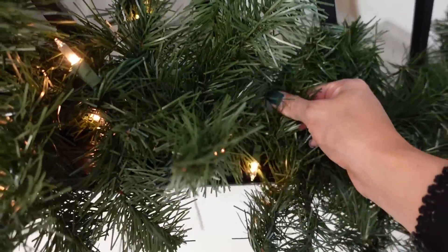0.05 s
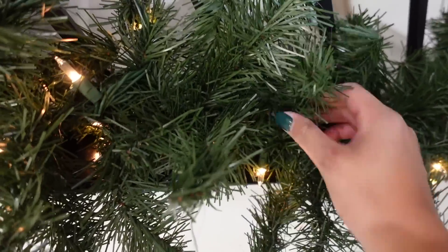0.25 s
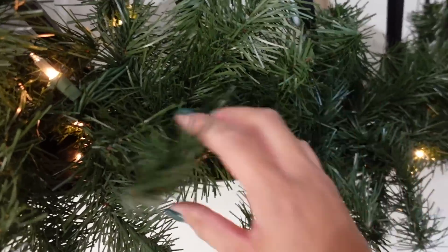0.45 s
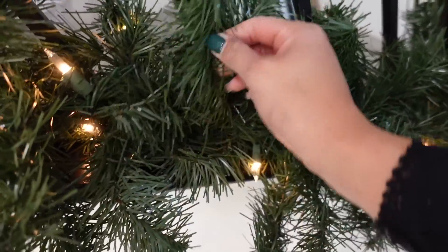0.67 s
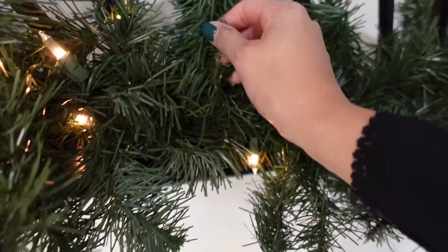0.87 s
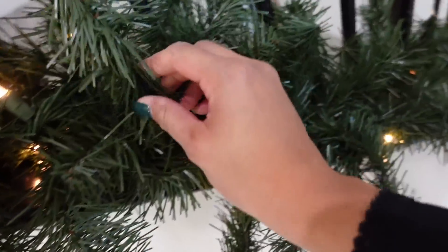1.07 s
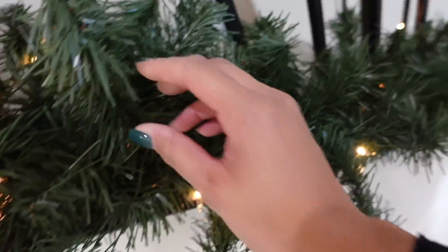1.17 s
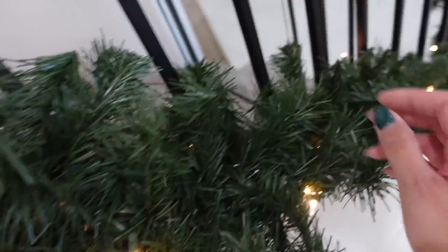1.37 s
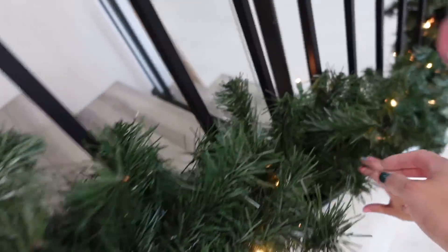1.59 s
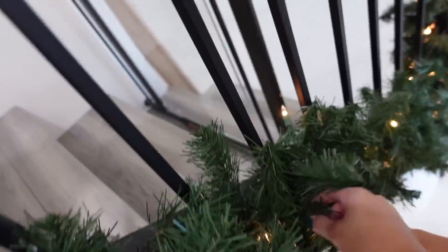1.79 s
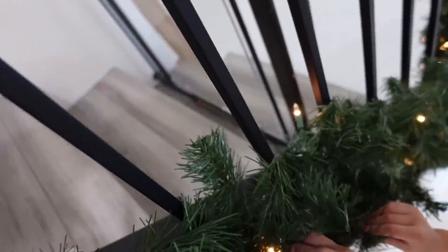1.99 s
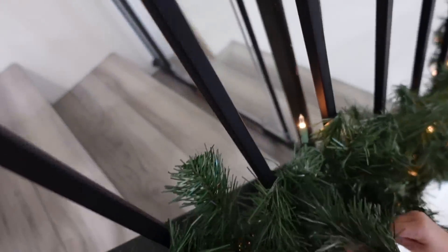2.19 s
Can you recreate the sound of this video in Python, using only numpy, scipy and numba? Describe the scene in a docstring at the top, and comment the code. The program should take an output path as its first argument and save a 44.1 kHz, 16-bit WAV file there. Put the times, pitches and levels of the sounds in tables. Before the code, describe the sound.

Close, crisp rustling of an artificial pine garland being handled, with small snaps and twig scrapes.

```python
"""Thousands of stiff plastic needles tick against each other as a hand works through a pine garland
on a stair rail, close by. Twigs scrape, a few needles snap free, and the wire branch is dragged and
knocked, dull and woody. One brief deep rumble comes early; late on, the sweeping hand rings
resonances by stick-slip. A hard stairwell adds a short tail over a quiet room tone."""
import sys
import numpy as np
from scipy import signal
from scipy.fft import rfft, irfft, next_fast_len
from scipy.io import wavfile
from scipy.ndimage import uniform_filter1d
from numba import njit

SR = 44100
rng = np.random.default_rng(int(sys.argv[2]) if len(sys.argv) > 2 else 0)


def master_out(mix):
    """Clip the mix to full scale and print it as 16-bit PCM to the path in sys.argv[1]."""
    frames = np.transpose(np.atleast_2d(mix))
    ceiling = np.clip(frames, -1, 1)
    pcm = np.round(ceiling * 32767).astype(np.int16)
    wavfile.write(sys.argv[1], SR, pcm)


N = 98960


def undb(db):
    """dB to gain."""
    return 10 ** (np.asarray(db) / 20)


def unit(x):
    """Scale to rms 1."""
    return x / np.sqrt(np.mean(x ** 2))


def envelope(table, col):
    """Per-sample gain from a dB column of a time table."""
    rows = np.array(table)
    return undb(np.interp(np.arange(N) / SR, rows[:, 0], rows[:, col]))


def colour(x, spectrum):
    """Filter by (f/Hz, level/dB) points."""
    rows, size = np.array(spectrum), next_fast_len(N + 4096)
    hz = np.maximum(np.arange(size // 2 + 1) * SR / size, 1)
    gain = undb(np.interp(np.log(hz), np.log(rows[:, 0]), rows[:, 1]))
    return irfft(rfft(x, size) * gain, size)[:N]


@njit
def damped_sines(start, rad_per_sample, decay, amp):
    """Sum of decaying phasors, each run down to -50 dB."""
    out = np.zeros(N)
    for g in range(len(start)):
        phasor, step = amp[g] + 0j, decay[g] * np.exp(1j * rad_per_sample[g])
        i, left = start[g], 1.
        while left > .003 and i < N:
            out[i] += phasor.imag
            phasor *= step
            left *= decay[g]
            i += 1
    return out


def ring(t_s, hz, t60_s, amp):
    """One damped sine per onset time."""
    each = np.ones(len(t_s))
    decay = np.exp(-np.log(1000) / (t60_s * SR))
    return damped_sines((t_s * SR).astype(np.int64), 2 * np.pi * hz / SR, decay * each, amp * each)


def ticks(count, spectrum, lo_hz, hi_hz, t60_cycles, scatter_db):
    """Dense ticks of random time, pitch, size and sign; rms 1."""
    when, pitch, size, polarity = rng.random((count, 4)).T
    hz = lo_hz + (hi_hz - lo_hz) * pitch
    level_db = np.minimum(-scatter_db * np.log(size + 1e-9), 10)
    amp = undb(level_db) * np.sign(polarity - .5) * np.sqrt(hz / hi_hz)
    return unit(colour(ring(when * N / SR, hz, t60_cycles / hz, amp), spectrum))


def bunches(rate_hz, depth_db, fade_s):
    """Gain that jumps up at random moments and sinks back."""
    kicks = (rng.random(N) < rate_hz / SR) * rng.random(N)
    swell = signal.lfilter([1], [1, -np.exp(-1 / (fade_s * SR))], kicks - kicks.mean())
    return undb(depth_db * np.tanh(1.9 * unit(swell)))


# Needle brushing: t/s, fine tip level/dB, stiff shaft level/dB
NEEDLE_LEVELS = [(0.0, -41.5, -42.5), (0.06, -40.5, -45.5), (0.12, -47, -52), (0.155, -41, -48.5),
                 (0.2, -43.5, -49.5), (0.32, -41, -44.5), (0.42, -48, -52.5), (0.64, -39, -45.5),
                 (0.67, -41, -45), (0.67, -36, -38), (0.69, -36.5, -40.5), (0.72, -39, -45.5),
                 (0.85, -39.5, -42), (0.87, -43.5, -45.5), (0.915, -36.5, -42.5), (0.93, -41, -46),
                 (0.97, -36, -42), (1.07, -39, -42.5), (1.08, -39.5, -34.5), (1.115, -42.5, -40),
                 (1.23, -46.5, -46.5), (1.24, -35, -42.5), (1.28, -45.5, -41.5), (1.29, -41, -39.5),
                 (1.33, -39, -39), (1.35, -46, -45), (1.38, -40, -41.5), (1.42, -45, -43.5),
                 (1.47, -41, -46), (1.51, -39, -37), (1.65, -33.5, -35), (1.73, -48, -45.5),
                 (1.78, -45, -43), (1.79, -34.5, -52), (1.81, -32.5, -32.5), (1.9, -32.5, -36),
                 (2.03, -47.5, -52), (2.16, -40, -50), (2.24, -48.5, -51)]
# Tip and shaft tick filters: f/Hz, level/dB
TIP_SPECTRUM = [(1500, -12), (4000, -13.5), (6500, -1), (8000, 0.5), (10500, 2), (12500, -5.5)]
SHAFT_SPECTRUM = [(700, -38), (2000, -8.5), (3500, 0), (5000, -1), (6500, -1), (10000, -12.5)]


def needles():
    """Stiff plastic needles brush past hand and neighbours, in bunches."""
    tips = ticks(30000, TIP_SPECTRUM, lo_hz=1550, hi_hz=13230, t60_cycles=8.1, scatter_db=-1.0)
    shafts = ticks(20000, SHAFT_SPECTRUM, lo_hz=785, hi_hz=10180, t60_cycles=10.5, scatter_db=2.5)
    brushing = envelope(NEEDLE_LEVELS, 1) * tips + envelope(NEEDLE_LEVELS, 2) * shafts
    return bunches(rate_hz=73, depth_db=1.014, fade_s=.0053) * brushing


# Branch drag: t/s, twig level/dB, stem level/dB
BRANCH_LEVELS = [(0.02, -46, -57.5), (0.25, -56.5, -68.5), (0.34, -48, -57.5), (0.45, -54.5, -63.5),
                 (0.66, -59, -73), (0.67, -43, -63), (0.69, -73, -62.5), (0.85, -49.5, -59.5),
                 (0.87, -49.5, -66), (1.06, -75, -70), (1.07, -48, -60.5), (1.24, -51.5, -64.5),
                 (1.29, -44, -61.5), (1.46, -45.5, -57.5), (1.52, -34.5, -54), (1.57, -39, -46.5),
                 (1.65, -35, -44.5), (1.78, -41.5, -51), (1.79, -29, -40.5), (1.89, -27, -37.5),
                 (2.08, -40.5, -51), (2.24, -47.5, -60.5)]
# Twig and stem tick filters: f/Hz, level/dB
TWIG_SPECTRUM = [(400, -22.5), (950, -10), (1250, -5), (1500, -3.5), (2350, -0.5), (2800, -1), (3400, -5.5),
                 (6000, -2.5), (12000, -11)]
STEM_SPECTRUM = [(50, -28), (100, -14), (200, -2), (310, -3.5), (450, -2.5), (700, -4.5), (1200, -8),
                 (2500, -16)]


def branch():
    """Twigs scrape and the stem rumbles as the branch is moved."""
    twigs = ticks(30000, TWIG_SPECTRUM, lo_hz=277, hi_hz=8900, t60_cycles=10.4, scatter_db=3.0)
    stem = ticks(16000, STEM_SPECTRUM, lo_hz=54, hi_hz=2560, t60_cycles=6.5, scatter_db=4.5)
    dragging = envelope(BRANCH_LEVELS, 1) * twigs + envelope(BRANCH_LEVELS, 2) * stem
    return bunches(rate_hz=100, depth_db=-.192, fade_s=.0047) * dragging  # negative depth: dips


# Room tone, mid and side: f/Hz, level/dB
ROOM_MID_SPECTRUM = [(30, -47), (80, 1), (200, -5.5), (350, 5), (500, -14.5), (1200, -2), (3000, -15.5)]
ROOM_SIDE_SPECTRUM = [(40, -9), (230, -3), (700, -8.5), (1900, -12), (2800, -30), (6000, -13.5),
                      (11000, -21)]


def room_tone(spectrum, level_db, drift_db=1.1, drift_hz=9.2):
    """Quiet coloured noise whose level wanders."""
    hold = int(SR / drift_hz)
    steps = rng.standard_normal(N)[np.arange(N) // hold]
    drift = unit(uniform_filter1d(steps, hold))
    return undb(level_db + drift_db * drift) * unit(colour(rng.standard_normal(N), spectrum))


# Stairwell tail, side filter: f/Hz, level/dB
TAIL_SIDE_SPECTRUM = [(100, -40), (500, -23), (1500, -15), (3000, -23), (11000, -67.5)]


def stairwell(x, t60_s=.096, delay_s=.004):
    """Hard walls reflect the sound as a short, decaying noise tail."""
    t = np.arange(int(.5 * SR)) / SR
    tail = rng.standard_normal(len(t)) * undb(-60 * t / t60_s) * (t > delay_s)
    return signal.fftconvolve(x, tail / np.sqrt(np.sum(tail ** 2)))[:N]


# Needle snaps: t/s, level/dB, f/Hz
NEEDLE_SNAPS = [(0.0525, -22.5, 6730), (0.134, -27, 9010), (0.152, -21.5, 7200), (0.2295, -28, 6300),
                (0.2475, -25, 10100), (0.311, -24, 5440), (0.313, -34, 5100), (0.3265, -26, 7300),
                (0.7748, -26, 6350), (0.7935, -20.5, 8900), (0.827, -19, 9800), (0.8481, -21, 9300),
                (0.8605, -28, 8100), (0.9151, -28.5, 7500), (0.9564, -28, 8800), (0.991, -29, 8050),
                (1.041, -31, 8200), (1.084, -23, 4030), (1.2884, -17, 9400), (1.3628, -27, 6500),
                (2.2178, -23, 7640)]
# Snap low cut: f/Hz, level/dB
SNAP_SPECTRUM = [(1200, -20), (4000, 0)]


def snaps(delay_s=.0011, scatter_s=.002, max_hz=11000):
    """A needle snaps free: a sharp crack, then a cluster of short rings around its pitch."""
    out = np.zeros(N)
    for t_s, db, hz in NEEDLE_SNAPS:
        onset_s = t_s + delay_s
        crack_hz = np.minimum(hz * np.array([.85, 1., 1.15]), max_hz)
        out += ring(np.full(3, onset_s), crack_hz, t60_s=.0016, amp=undb(db - 6))
        when, pitch = rng.random((6, 2)).T
        cluster_hz = np.minimum(hz * np.exp(.6 * (pitch - .5)), max_hz)
        out += ring(onset_s + scatter_s * when, cluster_hz, t60_s=.0079, amp=undb(db - 13))
    return colour(out, SNAP_SPECTRUM)


def rumble(start_s=.29, length_s=.15, hz=90, level_db=-65):
    """A brief deep band of noise."""
    t = np.arange(N) / SR - start_s
    gate = np.clip(t / .011, 0, 1) * np.clip((length_s - t) / .012, 0, 1)
    band = [(hz / 2, -14), (hz, 0), (hz * 2, -16), (hz * 4, -50)]
    return undb(level_db) * gate * unit(colour(rng.standard_normal(N), band))


# Stem knocks: t/s, ring level/dB, tilt about 1 kHz/(dB per octave), crack level/dB
STEM_KNOCKS = [(.328, -42, -2, -42), (.669, -44, 0, -42), (.775, -52, 1, -47), (.846, -46, -2, -36)]
# Stem modes: f/Hz, level/dB, t60/s
STEM_MODES = [(332, -13, 0.07), (710, -18, 0.033), (1420, -4, 0.017), (1660, -4, 0.031), (2800, -20, 0.012),
              (5670, -7.5, 0.0089)]


def knocks(contact_s=.005, bounce_s=.004, crack_cycles=6):
    """A short rough contact cracks, bounces once and rings the modes of the stem."""
    mode_hz, mode_db, t60_s = np.array(STEM_MODES).T
    out = np.zeros(N)
    for t_s, db, tilt_db, crack_db in STEM_KNOCKS:
        mode_amp = undb(db + mode_db + tilt_db * np.log2(mode_hz / 1000))
        for bounce, jitter in enumerate(rng.random((2, len(mode_hz)))):
            out += ring(t_s + bounce_s * (bounce + jitter / 2), mode_hz, t60_s, mode_amp)
        when, pitch, polarity = rng.random((16, 3)).T
        crack_hz = 800 * np.exp(2.45 * pitch)
        crack_amp = undb(crack_db) * np.sqrt(crack_hz / 2000) * np.sign(polarity - .5)
        out += ring(t_s + contact_s * when, crack_hz, crack_cycles / crack_hz, crack_amp)
    return out


# Swept branch resonances: t/s, length/s, start f/Hz, end f/Hz, level/dB
SWEEP_RESONANCES = [(1.81, .17, 2500, 2500, -43), (1.81, .17, 1440, 1080, -39),
                    (1.79, .11, 202, 193, -46.5), (1.5, .2, 460, 430, -50.5)]


def hand_sweep(t60_cycles=28, detune=.06):
    """The hand sweeps the branch: stick-slip ticks ring resonances that hold or glide down."""
    out = np.zeros(N)
    for t_s, length_s, start_hz, end_hz, db in SWEEP_RESONANCES:
        progress, pitch, size = rng.random((60, 3)).T
        hz = (start_hz + (end_hz - start_hz) * progress) * (1 + detune * (pitch - .5))
        amp = undb(db) * size * np.sin(np.pi * progress) ** .5
        out += ring(t_s + length_s * progress, hz, t60_cycles / hz, amp)
    return out


def scene(tail_mid_db=-18):
    """Garland in the middle; stairwell tail and room tone spread to the sides."""
    garland = needles() + branch() + hand_sweep() + snaps() + knocks() + rumble()
    mid = garland + undb(tail_mid_db) * stairwell(garland)
    mid += room_tone(ROOM_MID_SPECTRUM, level_db=-62.5)
    side = colour(stairwell(garland), TAIL_SIDE_SPECTRUM)
    side += room_tone(ROOM_SIDE_SPECTRUM, level_db=-63)
    return np.array([mid + side, mid - side])


def record(dry):
    """The phone cuts the deep bass and the top."""
    low_cut_hz, high_cut_hz = 148, 11700
    highpass = signal.butter(2, low_cut_hz, "high", fs=SR, output="sos")
    lowpass = signal.ellip(12, .2, 80, high_cut_hz, fs=SR, output="sos")
    return signal.sosfilt(lowpass, signal.sosfilt(highpass, dry))


dry = scene()
out = record(dry)
master_out(out)
```